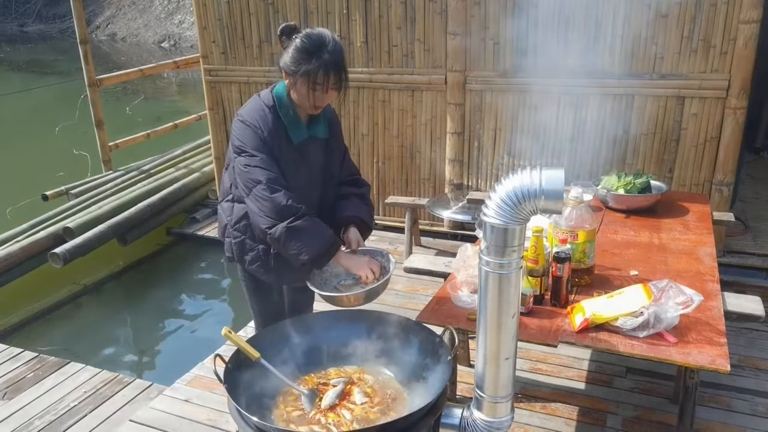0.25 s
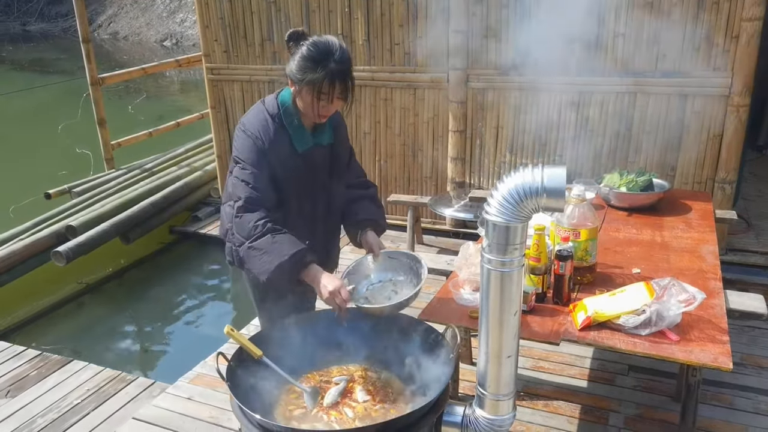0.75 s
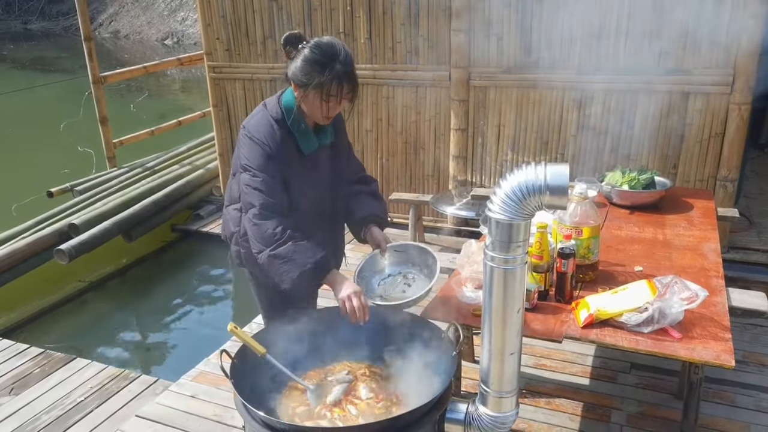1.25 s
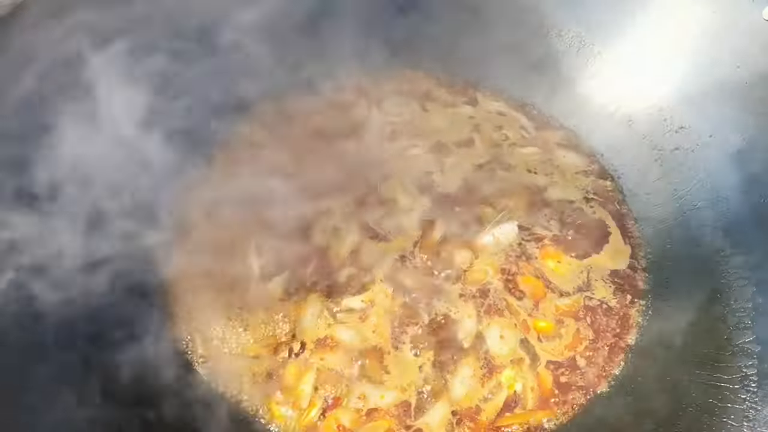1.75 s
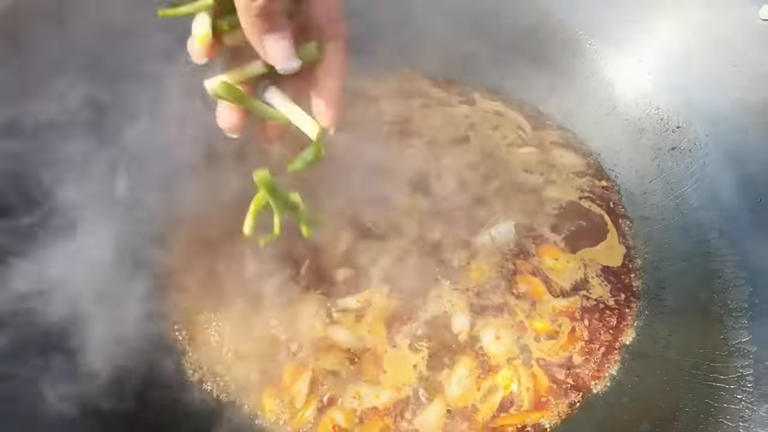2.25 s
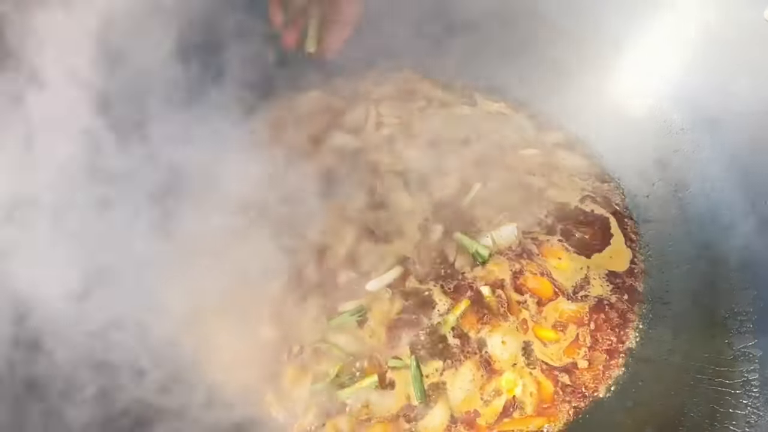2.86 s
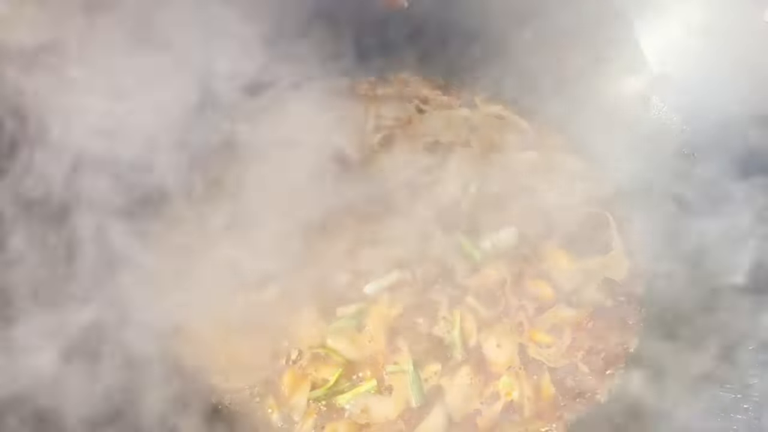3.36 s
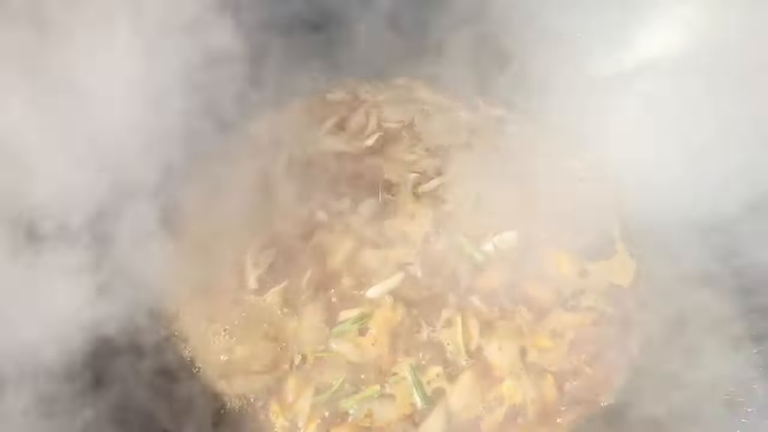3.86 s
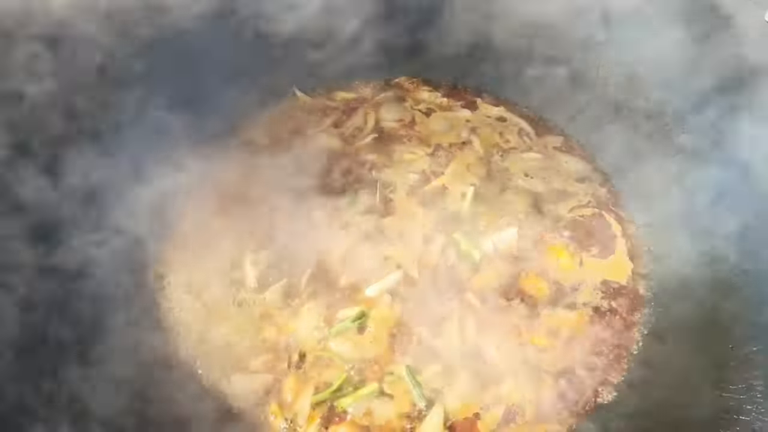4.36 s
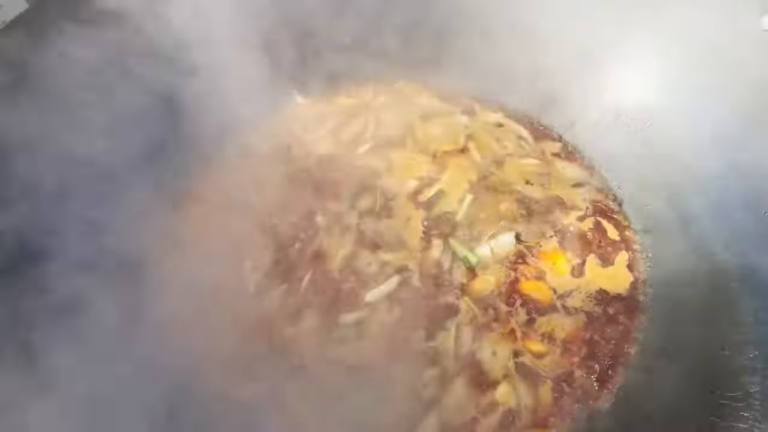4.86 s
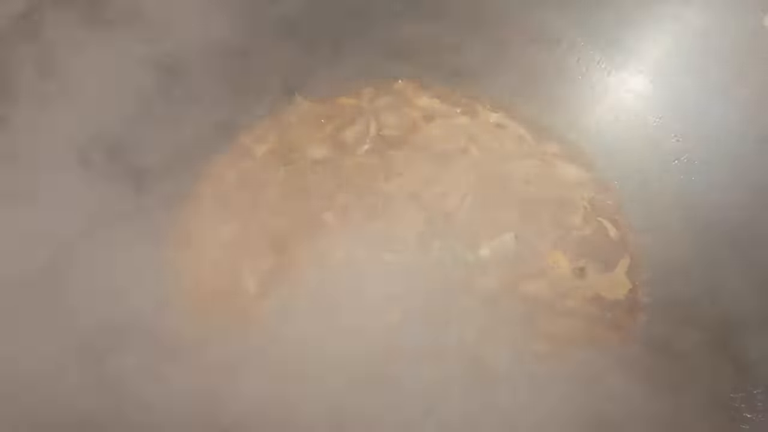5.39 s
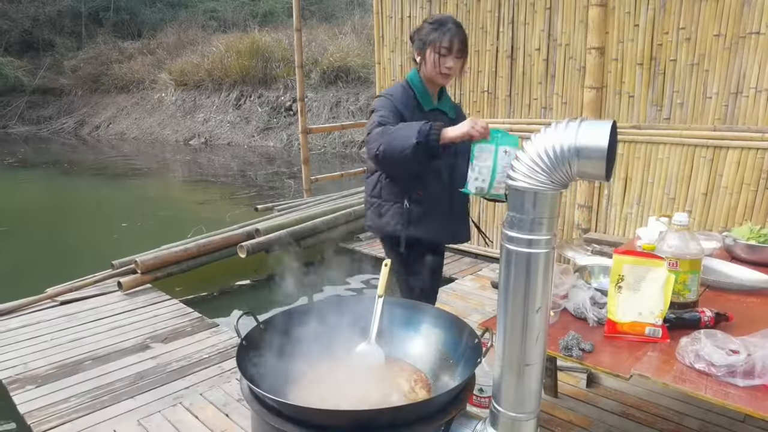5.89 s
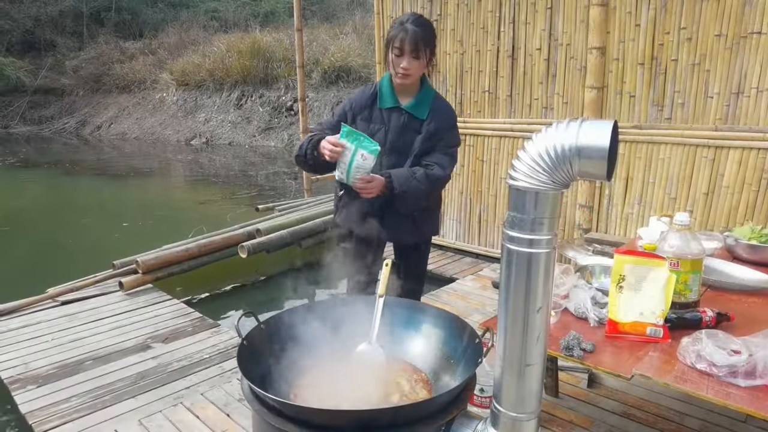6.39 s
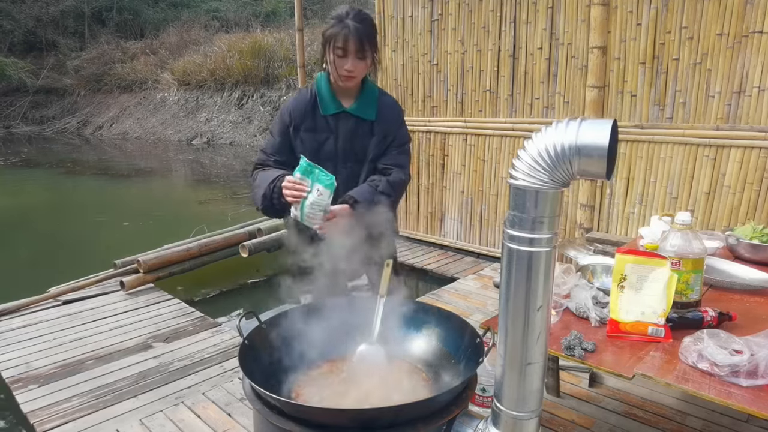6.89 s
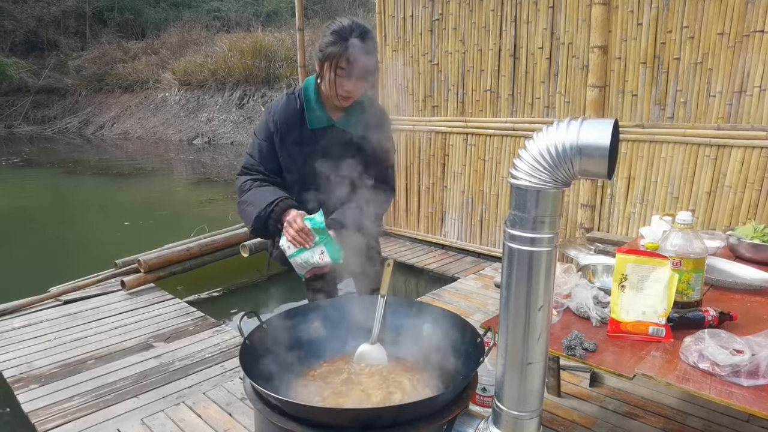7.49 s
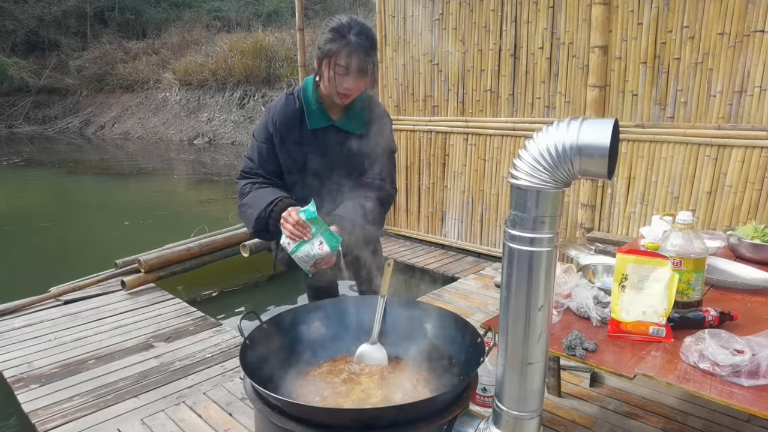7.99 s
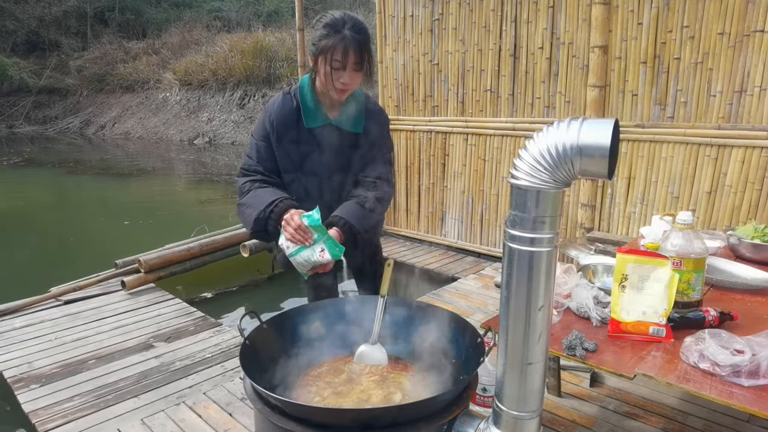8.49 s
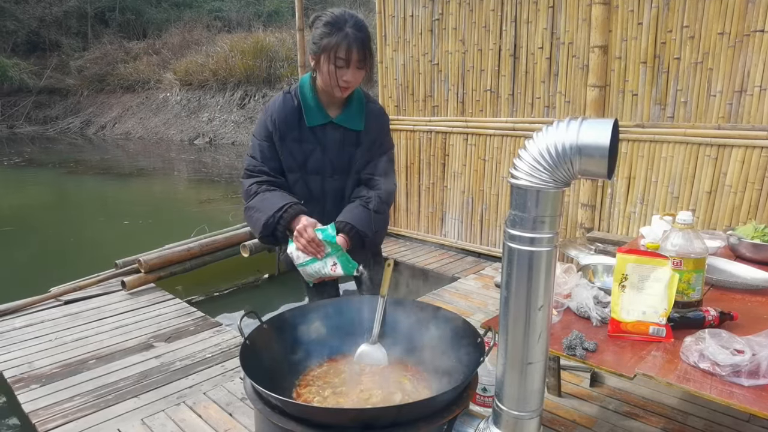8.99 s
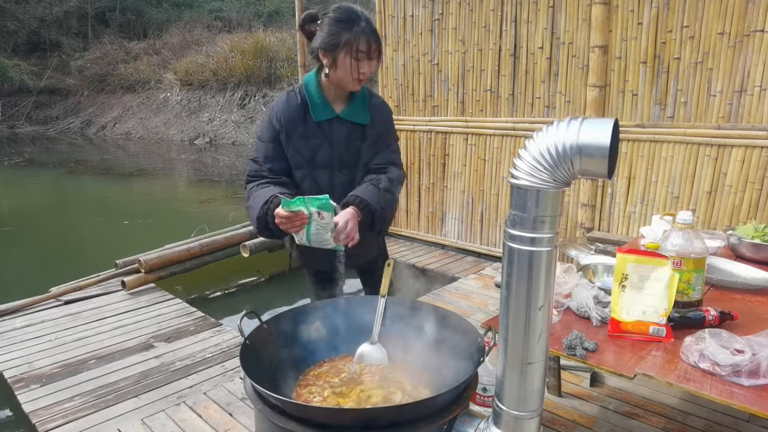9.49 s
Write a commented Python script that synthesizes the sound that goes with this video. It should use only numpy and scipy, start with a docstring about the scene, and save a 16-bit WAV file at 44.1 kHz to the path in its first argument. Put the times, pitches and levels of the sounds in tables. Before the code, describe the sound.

Dense high hissing of a boiling wok outdoors, recorded near, with low bumps of wind. The view moves over the pot: a brief hush, a half-second surge, then steady sizzle with a low murmur. Cutting farther off, the boil becomes faint and hands tear and shake a plastic bag, sharp crackles clustering early, then scattered clicks, a faint squeak and a last bright slide.

```python
"""Stew in a wok and a plastic bag

A wok of stew boils and sizzles on an open deck, heard beside it, over it, then farther off: noise shaped by bursts.
At the last place hands tear and shake a plastic bag: decaying noise for snaps, crinkle and slides; bumps ring dully.
A faint whistle and a squeak pass, a low hum comes and goes (unsteady sines), and a breathy note tops the squeak.
Low noise heaves as bubbles gulp in the wok and, at the end, in dull thuds; wind puffs on the two microphone ports."""
import sys
import numpy as np
from scipy import signal
from scipy.fft import rfft, irfft, next_fast_len
from scipy.io import wavfile
from scipy.ndimage import uniform_filter1d

SR = 44100
rng = np.random.default_rng(int(sys.argv[2]) if len(sys.argv) > 2 else 0)


def digitize_waveform(pressure):
    """Quantize a signal to 16-bit integers and store it at the path in sys.argv[1].

    Rows of a 2-D input are taken as channels; values are limited to [-1, 1].
    """
    field = np.atleast_2d(pressure).T
    bounded = np.clip(field, -1, 1)
    quanta = np.round(bounded * 32767).astype(np.int16)
    wavfile.write(sys.argv[1], SR, quanta)


N = 429534  # length [samples]

# Spectra below give relative levels; each source is then set to its own level.
# Low burbling and heaves: (frequency [Hz], level [dB])
LOW_COLOUR = [(40, -18), (120, -7.5), (200, 2), (330, 1), (500, -11), (900, -12.5), (1500, -22.5)]
# Wind at the ports: (frequency [Hz], level [dB])
WIND_COLOUR = [(20, -45), (35, -39), (55, -8), (85, -2), (120, 0.5), (170, -4), (260, -23.5), (500, -45)]
# Steady low sound: (time [s], burbling level [dB], wind level [dB])
LOW_FLOOR = [(0.0, -67.5, -54), (1.78, -66, -65), (1.8, -62, -63), (1.98, -60, -67), (2.0, -52, -57),
             (2.44, -50.5, -60), (2.55, -57.5, -62), (5.51, -63, -64), (5.53, -55.5, -62.5),
             (6.84, -59, -73), (6.88, -63, -70), (9.74, -61, -67)]
# Low heaves: bubbles gulping in the wok, and at the end dull low thuds: (start [s], hold [s], level [dB])
HEAVES = [(1.45, .02, -66), (1.545, 0.022, -55), (2.042, 0.042, -41), (2.187, .02, -39.5),
          (2.316, 0.027, -45.5), (2.434, .03, -57), (2.845, .02, -56), (3.85, 0.016, -45),
          (3.99, 0.034, -48), (4.21, 0.018, -49.5), (4.49, 0.054, -53.5), (4.68, .02, -52),
          (5.24, 0.086, -47.5), (5.336, 0.023, -51), (5.46, .04, -49), (6.202, 0.13, -60),
          (6.444, 0.024, -49.5), (8.61, 0.066, -57), (8.95, 0.044, -49), (9.378, 0.083, -54)]
# Gusts on the ports: (start [s], hold [s], level [dB])
GUSTS = [(0.015, .05, -54), (0.138, 0.041, -45.5), (0.29, 0.025, -47.5), (0.396, .08, -51),
         (0.53, 0.027, -59), (0.692, 0.036, -43.5), (0.767, .05, -43.5), (0.881, 0.075, -41.5),
         (1.458, 0.022, -53.5), (1.518, 0.051, -52), (1.833, 0.044, -58), (2.466, 0.031, -58),
         (3.087, .04, -51), (3.61, 0.053, -52), (4.0, .03, -56), (4.884, 0.025, -53), (5.283, 0.067, -56),
         (5.41, 0.024, -48), (5.498, .015, -44.5), (5.757, 0.047, -50.5), (6.596, .04, -52),
         (8.33, .02, -67), (8.74, .02, -60), (9.433, 0.036, -63)]
# Deeper puffs of wind, felt more than heard: (start [s], hold [s], level [dB])
DEEP_PUFFS = [(1.55, .06, -61), (1.85, .05, -59), (2.15, .15, -54), (2.456, .05, -54), (3.62, .05, -57),
              (3.818, .02, -57), (4.406, 0.091, -56), (4.884, 0.025, -47), (5.167, 0.016, -58),
              (8.07, .02, -59), (8.334, .03, -61)]
# Deep wind: (frequency [Hz], level [dB])
DEEP_COLOUR = [(12, -9), (30, -6), (55, 1), (90, -9), (150, -40)]

# Sizzle at each place: (frequency [Hz], left level [dB], right level [dB], left-right likeness [0-1])
BESIDE_COLOUR = [(400, -33.5, -32.5, 1), (860, -34.5, -38.5, 0.83), (1550, -26, -31, 0.36),
                 (2230, -17.5, -27.5, 0.3), (3160, -16.5, -24, 0.06), (4930, -15, -17, 0.43),
                 (6270, -12, -10, 0.3), (6940, -26, -11, 0), (8530, -5, -2.5, 0), (9330, -1, -6, 0),
                 (10300, -1, -16, 0.2), (11870, -8.5, -20, 0.3), (12800, -5.5, -34, 0.22),
                 (15900, -5.5, -15, 0)]
OVER_COLOUR = [(400, -24, -27.5, 0.77), (870, -32, -33, 0.12), (1480, -23.5, -22.5, 0.76),
               (2340, -16, -17.0, 0.66), (3000, -16.5, -18.5, 0.31), (4130, -18, -17.5, 0.19),
               (4770, -14, -14.5, 0.19), (5550, -11.5, -2.5, 0.067), (6600, -7, -4.5, 0.12),
               (6920, -12.5, -6, 0.067), (8500, -2, -3, 0.13), (9950, 0, -7, 0.052),
               (10770, -2.5, -9, 0.038), (16100, -15, -21.5, 0.09)]
FARTHER_COLOUR = [(370, -18, -25, 0.33), (820, -17.5, -19, 0.93), (1390, -38, -39, 1),
                  (2560, -17, -14.5, 0.31), (4600, -19, -24, 0.11), (5600, -14, -10.5, 0.29),
                  (7400, -6, -8, 0.12), (8200, -13.5, -10, 0.18), (9100, -27, -3, 0.21),
                  (9670, 0.5, -1.5, 0.12), (10670, 5, 3.5, 0.17), (12600, 0, -27.5, 0.27),
                  (14200, -13.5, -17, 0.16), (15600, -9.5, -13, 0.13)]
# One list per stretch of steady listening: (time [s], level [dB])
SIZZLE_LEVELS = [
    [(0.0, -27.5), (0.9, -26.5), (1.3, -28.5), (1.45, -26), (1.55, -27.5), (1.789, -26.5)],
    [(1.789, -41), (1.982, -38.5)],
    [(1.982, -38), (1.994, -19), (2.44, -19)],
    [(2.44, -25), (2.62, -25), (2.8, -26.5), (3.1, -27), (3.24, -26), (3.8, -27.5), (4.2, -26.5),
     (5.3, -27.5), (5.38, -29), (5.52, -28)],
    [(5.52, -37.5), (5.87, -39), (6.1, -44), (7.39, -41.5), (8.46, -44), (8.96, -41.5), (9.74, -42.5)],
]
# Place of each stretch: (index [0 beside, 1 over, 2 farther])
PLACE = [0, 1, 1, 1, 2]
# Delay of the wok at the right port, at each place: (delay [samples])
RIGHT_LATE = [1, 14, 3]
# Deeper murmur of the stew, heard only from over the wok: (time [s], level [dB])
MURMUR_LEVELS = [(1.789, -57), (5.52, -61)]
# Murmur: (frequency [Hz], left level [dB], right level [dB], left-right likeness [0-1])
MURMUR_COLOUR = [(300, -17, -13, .9), (640, 2.5, 0.5, 1), (950, -1.5, -2, 0.8), (1250, 0.5, -2.5, 1),
                 (2500, -38, -40, .3)]

# Spells of fingering the bag over a faint lasting crinkle: (start [s], hold [s], level [dB])
CRINKLE_SPELLS = [(5.54, 0.4, -59), (6.007, 0.15, -50), (6.204, 0.19, -49), (6.462, 0.048, -54),
                  (6.596, 0.26, -49.5), (7.095, 0.06, -61), (7.454, 0.11, -57.5), (8.307, 0.084, -61),
                  (8.76, 0.25, -64.5), (9.56, 0.15, -61.5)]
# Crinkle: (frequency [Hz], level [dB])
CRINKLE_COLOUR = [(400, -16), (900, -0.5), (1300, -3), (1900, 4.5), (2800, 3.5), (3400, -3), (5000, -2),
                  (7500, -16)]
# Slides of the plastic: (start [s], hold [s], level [dB])
SLIDES = [(5.552, 0.9, -50), (6.6, .22, -47), (7.342, .03, -43.5), (7.465, .03, -45), (8.62, .02, -43.5),
          (8.763, 0.04, -48), (9.59, .09, -35.5)]
# Hiss of the slides: (frequency [Hz], level [dB])
SWISH_COLOUR = [(2000, -38), (3000, -20), (6000, -11.5), (7500, -4.5), (9500, 4.5), (12000, 2.5),
                (15500, -22)]
# Soft bumps on the deck or table: (time [s], peak level [dB], pitch [Hz])
BUMPS = [(5.633, -40.5, 380), (5.829, -39, 330), (6.016, -52, 315), (6.305, -43, 360), (6.578, -37.5, 258),
         (6.816, -40.5, 340), (7.23, -52, 1000), (7.944, -50, 497), (8.031, -45.5, 340), (8.304, -49, 970),
         (8.345, -48, 258), (8.625, -46, 720), (8.67, -53, 600), (8.909, -51, 700), (8.943, -43, 516),
         (8.964, -41, 302), (9.379, -50, 696), (9.42, -44, 284), (9.71, -49, 300)]
# Bumps: (frequency [Hz], level [dB])
BUMP_COLOUR = [(40, -30), (130, -16), (200, -1), (2000, 8)]
# Bag snaps: (time [s], nominal peak [dB], dull part re that [dB], left re right [dB], ring pitch [Hz])
SNAPS = [(5.794, -20, -21, -3, 2560), (5.815, -16, -21, 2.5, 2100), (5.9449, -27, -30, 3.5, 2430),
         (5.9784, -20, -32, -1, 2690), (6.011, -22, -21, -2, 2620), (6.117, -16.5, -15.5, 2, 1900),
         (6.1465, -13, -18, 1.5, 1960), (6.186, -8.5, -22, 3, 3120), (6.2668, -25.5, -10, 0.0, 1890),
         (6.2844, -27, -5, 2, 925), (6.303, -20.5, -16, -3, 1940), (6.3334, -15, -15, 3, 1630),
         (6.3619, -13.5, -14, -1, 1990), (6.3736, -26.5, -7, 4, 2080), (6.4636, -19.5, -15.5, 2, 2890),
         (6.482, -32.5, -3.5, 4, 2860), (6.5853, -14, -18, 3, 1950), (6.5923, -13, -15.5, -1, 1030),
         (6.634, -20.5, -18, 3, 1950), (6.653, -19, -20, 1, 2000), (6.6597, -8, -22.5, 1, 1060),
         (6.672, -19, -17, 1, 1500), (6.6824, -11.5, -23, -2, 2000), (6.706, -12, -18, 5, 1720),
         (6.7298, -16.5, -16, -2, 930), (6.7416, -11, -19, 4, 940), (6.7772, -25, -11, 3, 980),
         (6.8, -16.5, -10.5, 1, 1490), (6.818, -10, -15.5, 4, 1040), (6.9264, -20, -37, -3, 2550),
         (7.1283, -28, -11, 3.5, 2560), (7.3474, -17.5, -34, -1, 2510), (7.3693, -16.5, -24, 4, 1740),
         (7.467, -30, -5.5, 2, 2640), (7.4994, -26.5, -15, 3.5, 1100), (7.588, -25, -36, 5, 1830),
         (8.0483, -28, -15, 0, 2620), (8.096, -23, -18, 3.5, 2140), (8.3146, -36.5, -7, -1, 980),
         (8.37, -26, -7, -2, 1810), (8.8948, -20.5, -22, 1, 1790), (8.9523, -17.5, -26, 5, 2730),
         (8.9698, -28, -6, 1.5, 950), (9.1436, -20, -29.5, 2, 3190), (9.2075, -31, -26, 4.5, 2500),
         (9.3511, -29, -27, 3.0, 2680), (9.407, -24.5, -14.5, 1, 844), (9.447, -30, -12, 0, 912),
         (9.486, -18, -40, 4.5, 2690), (9.5636, -30, -41, -7, 2890), (9.6937, -20, -22, -2, 2500)]
# Bright crack of a snap: (frequency [Hz], level [dB])
SNAP_BRIGHT = [(2500, -29.5), (4300, -10), (5300, -12), (8500, 1), (11000, 2.5), (15500, -21)]
# Dull rattle of a snap: (frequency [Hz], level [dB])
SNAP_DULL = [(300, -54), (700, -5), (1100, 4), (1800, 9.5), (2600, 6.5), (3500, -2), (5000, 0), (7000, -20)]

# Gliding notes, the next five tables:
# (start [s], length [s], first pitch [Hz], last pitch [Hz], first level [dB], last level [dB])
# Low hum, in two spells
HUM = [(6.5, 1.17, 75.3, 77.4, -61, -68.5), (9.02, 0.75, 76.3, 74.2, -60, -66)]
# Short low drone
DRONE = [(6.5, 0.13, 186, 170.6, -57, -49)]
# Faint whistle
WHISTLE = [(8.1, .165, 2170, 2080, -61, -62), (8.26, .06, 2170, 2140, -62, -63)]
# Long narrow part of the squeak
SQUEAK = [(8.74, .19, 2800, 2750, -55, -63)]
# Short breathy part above it
SQUEAK_TOP = [(8.775, .07, 3400, 3600, -53, -59)]

# Rises and falls below are the times in which a swell gains or loses about 17 dB.
HEAVE_RISE_S, HEAVE_FALL_S = 0.017, 0.04
GUST_RISE_S, GUST_FALL_S = 0.016, 0.027
DEEP_FLOOR_DB = -76
BAG_FROM_S = 5.52  # the bag is heard only at the last place
CRINKLE_FLOOR_DB, CRINKLE_RISE_S, CRINKLE_FALL_S = -65.5, 0.023, 0.014
SWISH_RISE_S, SWISH_FALL_S = 0.049, 0.055
CRACK_TAIL_S, RATTLE_TAIL_S, RING_S = 0.07, 0.05, 0.012  # 60 dB decay times in a snap
EDGE_HZ = 15790


def gain_of(db):
    """Logarithmic level: decibels become an amplitude ratio."""
    return 10 ** (np.asarray(db) / 20)


def evened(x):
    """Energy normalisation: the mean of the channels gets rms 1."""
    return x / np.sqrt(np.mean(np.atleast_2d(x).mean(0) ** 2) + 1e-20)


def read(hz, at, value):
    """Spectral interpolation along a logarithmic frequency axis."""
    return np.interp(np.log(hz + 1), np.log(np.asarray(at) + 1), value)


def coloured(x, points):
    """Linear filtering: each frequency is scaled by a (Hz, dB) spectrum."""
    n = x.shape[-1]
    hz = np.fft.rfftfreq(n, 1 / SR)
    return irfft(rfft(x) * gain_of(read(hz, *np.transpose(points))), n)


def add(mix, s, sound):
    """Superposition: pressures sum, here from time s onward."""
    part = mix[:, round(s * SR):][:, :sound.shape[-1]]
    part += sound[..., :part.shape[1]]


def unrolled(rows):
    """Linear interpolation: start time and columns of a curve, sample by sample."""
    s, *columns = np.transpose(rows)
    t = np.arange(s[0], s[-1], 1 / SR)
    return s[0], [np.interp(t, s, c) for c in columns]


def glide(row):
    """Uniform glide: pitch and level move evenly from first values to last."""
    s, length, first_hz, last_hz, first_db, last_db = row
    return unrolled([(s, first_hz, first_db), (s + length, last_hz, last_db)])


def bursts(n, per_s, spread_db, t60):
    """Shot noise: random bursts start sharply and decay exponentially; mean power 1."""
    starts = rng.random(n) < per_s / SR
    size = gain_of(spread_db * np.minimum(rng.exponential(1, n), 4)) ** 2 * starts
    power = signal.lfilter([1], [1, -np.exp(-2 * np.log(1000) / (t60 * SR))], size)
    return power / power.mean()


def pair(envelope, same):
    """Partial correlation: two noises under one envelope, alike by the share same."""
    a, b = rng.standard_normal((2, len(envelope)))
    same = np.clip(same, 0, 1)
    return envelope * np.array([a, same * a + np.sqrt(1 - same ** 2) * b])


def patchy(x, patch_db):
    """Time-frequency modulation: patches of some hundred Hz by some tens of ms vary in level."""
    z = signal.stft(x, nperseg=512)[2]
    patches = uniform_filter1d(rng.standard_normal(z.shape[1:]), 4, 0)
    patches = uniform_filter1d(patches, 5, 1)
    z = z * gain_of(patch_db * patches / patches.std())
    return signal.istft(z, nperseg=512)[1][:, :x.shape[1]]


def swells(t, floor_db, rows, rise_s, fall_s):
    """Incoherent addition: powers of a floor and of swelling, holding, dying events sum to a gain."""
    power = gain_of(floor_db) ** 2 * np.ones(len(t))
    for s, hold, db in rows:
        rise = (np.maximum(s - t, 0) / rise_s) ** 2
        fall = np.maximum(t - s - hold, 0) / fall_s
        power += gain_of(db) ** 2 * np.exp(-4 * rise - 4 * fall)
    return np.sqrt(power)


def ring(hz, t60, n):
    """Damped resonance: a sine that decays exponentially."""
    t = np.arange(n) / SR
    return np.sin(2 * np.pi * hz * t) * gain_of(-60 * t / t60)


def low_heaves():
    """Low-frequency shot noise: a burbling floor with low heaves, nearly alike at both ports."""
    t, n = np.arange(N) / SR, next_fast_len(N)
    s, level_db, _ = np.transpose(LOW_FLOOR)
    envelope = np.sqrt(0.59 + 0.18 * bursts(n, 30, 2.3, 0.03))
    noise = evened(coloured(pair(envelope, 0.94), LOW_COLOUR)) * gain_of([[1.5], [-1.5]])
    return swells(t, np.interp(t, s, level_db), HEAVES, HEAVE_RISE_S, HEAVE_FALL_S) * noise[:, :N]


def wind():
    """Turbulent pressure: low noise comes in lumps, only partly alike at the two ports."""
    t, n = np.arange(N) / SR, next_fast_len(N)
    s, _, level_db = np.transpose(LOW_FLOOR)
    envelope = np.sqrt(0.71 + 0.27 * bursts(n, 18, 3.3, 0.3))
    noise = evened(coloured(pair(envelope, 0.41), WIND_COLOUR))
    return swells(t, np.interp(t, s, level_db), GUSTS, GUST_RISE_S, GUST_FALL_S) * noise[:, :N]


def deep_wind():
    """Slow turbulence: still lower noise swells in puffs, almost unlike at the two ports."""
    t, n = np.arange(N) / SR, next_fast_len(N)
    noise = evened(coloured(pair(np.ones(n), 0.1), DEEP_COLOUR))
    return swells(t, DEEP_FLOOR_DB, DEEP_PUFFS, GUST_RISE_S, GUST_FALL_S) * noise[:, :N]


def sizzle(rows, colour, late):
    """Dense shot noise: steam bubbles burst beyond counting, fat spits at times, the boil flutters."""
    s, (level_db,) = unrolled(rows)
    n = next_fast_len(len(level_db))
    flutter_db = 0.48 * evened(uniform_filter1d(rng.standard_normal(n), 1500))
    power = 1.1 + 0.3 * bursts(n, 700, 2.6, 0.008) + 0.05 * bursts(n, 40, 2.2, 0.03)
    noise = rng.standard_normal((2, n)) * np.sqrt(power) * gain_of(flutter_db)
    a, b = rfft(patchy(noise, patch_db=1.5))
    hz = np.fft.rfftfreq(n, 1 / SR)
    at, left_db, right_db, same = np.transpose(colour)
    same = np.clip(read(hz, at, same), 0, 1)
    thin = hz ** 2 / (hz ** 2 + 300 ** 2)  # weakens the bass
    # echoes off the iron, 0.356 and 0.95 ms late
    bowl = 1 + 0.022 * np.exp(-2j * np.pi * hz * 0.000356) + 0.017 * np.exp(-2j * np.pi * hz * 0.00095)
    left = a * gain_of(read(hz, at, left_db))
    delayed = a * np.exp(-2j * np.pi * hz * late / SR)
    right = (same * delayed + np.sqrt(1 - same ** 2) * b) * gain_of(read(hz, at, right_db))
    sound = evened(irfft(np.array([left, right]) * thin * bowl, n))
    return s, gain_of(level_db) * sound[:, :len(level_db)]


def murmur():
    """Spectral weighting: the burst noise of the boil, weighted to a deeper band."""
    return sizzle(MURMUR_LEVELS, MURMUR_COLOUR, late=4.6)


def crinkle():
    """Clustered shot noise: many small creases yield under the fingers, dense and in clumps."""
    t = np.arange(BAG_FROM_S, N / SR, 1 / SR)
    grain = np.sqrt(0.4 + bursts(len(t), 200, 3.5, 0.025))
    creases = evened(patchy(coloured(pair(grain, 0.4), CRINKLE_COLOUR), patch_db=4.0))
    level = swells(t, CRINKLE_FLOOR_DB, CRINKLE_SPELLS, CRINKLE_RISE_S, CRINKLE_FALL_S)
    return BAG_FROM_S, level * creases


def swish():
    """Friction noise: a smooth bright hiss as the plastic slides or its contents pour."""
    t = np.arange(BAG_FROM_S, N / SR, 1 / SR)
    hiss = evened(patchy(coloured(pair(np.ones(len(t)), 0.2), SWISH_COLOUR), patch_db=2.0))
    return BAG_FROM_S, swells(t, -np.inf, SLIDES, SWISH_RISE_S, SWISH_FALL_S) * hiss


def bump(row):
    """Impact excitation: a soft blow of some ms rings a dull wooden note."""
    s, peak_db, hz = row
    samples = np.arange(1500)
    onset = np.minimum(samples / 150, 1)
    blow = pair(gain_of(-60 * samples / SR / 0.087) * onset, 0.88)
    sound = coloured(signal.fftconvolve(blow, ring(hz, 0.02, 1500)[None]), BUMP_COLOUR)
    return s, gain_of(peak_db) * sound / abs(sound.mean(0)).max()


def snap(row):
    """Sudden buckling: a crease gives way in a bright crack, a duller ringing rattle and a short tail."""
    s, peak_db, dull_db, pan_db, hz = row
    t = np.arange(-256, 1792) / SR  # the lead leaves room for the filters to spread
    after = np.maximum(t, 0)
    crack = (t >= 0) * (gain_of(-60 * after / 0.004) + gain_of(-13.5 - 60 * after / CRACK_TAIL_S))
    rattle = (t >= 0) * (gain_of(-60 * after / 0.011) + gain_of(-4.5 - 60 * after / RATTLE_TAIL_S))
    rattle = pair(rattle, 0.82)
    rung = signal.fftconvolve(rattle, ring(hz, RING_S, 600)[None])[:, :len(t)]
    parts = coloured(pair(crack, 0.6), SNAP_BRIGHT), coloured(rattle, SNAP_DULL), rung
    bright, dull, rung = (x / abs(x.mean(0)).max() for x in parts)
    sound = 0.72 * bright + gain_of(dull_db) * (0.87 * dull + 0.47 * rung)
    return s + t[0], gain_of(peak_db + pan_db * np.array([[0.5], [-0.5]])) * sound


def tone(row, waver, broken):
    """Frequency and amplitude modulation: a gliding sine, unsteady by the shares waver and broken."""
    s, (hz, level_db) = glide(row)
    drift, flicker = (evened(uniform_filter1d(rng.standard_normal(len(hz)), span)) for span in (900, 200))
    phase = 2 * np.pi * np.cumsum(hz * (1 + waver * drift)) / SR
    wave = np.sqrt(2) * np.sin(phase) * evened(1 + broken * flicker)
    return s, (gain_of(level_db) * wave * signal.windows.tukey(len(hz), 0.15))[None]


def puff(row):
    """Ring modulation: slow noise times a sine gives breath some hundred Hz wide around a pitch."""
    s, (hz, level_db) = glide(row)
    breath = uniform_filter1d(pair(np.ones(len(hz)), 0.55), size=40)
    wave = evened(breath * np.sin(2 * np.pi * np.cumsum(hz) / SR))
    return s, gain_of(level_db) * wave * signal.windows.tukey(len(hz), 0.2)


def scene():
    """Superposition of all sources at the two ports."""
    mix = low_heaves() + wind() + deep_wind()
    colours = BESIDE_COLOUR, OVER_COLOUR, FARTHER_COLOUR
    for rows, place in zip(SIZZLE_LEVELS, PLACE):
        add(mix, *sizzle(rows, colours[place], RIGHT_LATE[place]))
    for source in (murmur, crinkle, swish):
        add(mix, *source())
    for source, table in ((bump, BUMPS), (snap, SNAPS)):
        for row in table:
            add(mix, *source(row))
    for table, waver, broken in ((HUM, 0.03, 0.3), (DRONE, 0.04, 0.5), (WHISTLE, 0.01, 0.34), (SQUEAK, 0.01, 0.6)):
        for row in table:
            add(mix, *tone(row, waver, broken))
    for row in SQUEAK_TOP:
        add(mix, *puff(row))
    return mix


def record(dry):
    """Band limitation: a steep linear-phase low-pass at EDGE_HZ."""
    low_pass = signal.firwin(1023, EDGE_HZ, window=("kaiser", 9), fs=SR)
    return signal.oaconvolve(dry, low_pass[None], "same")


dry = scene()
out = record(dry)
digitize_waveform(out)
```